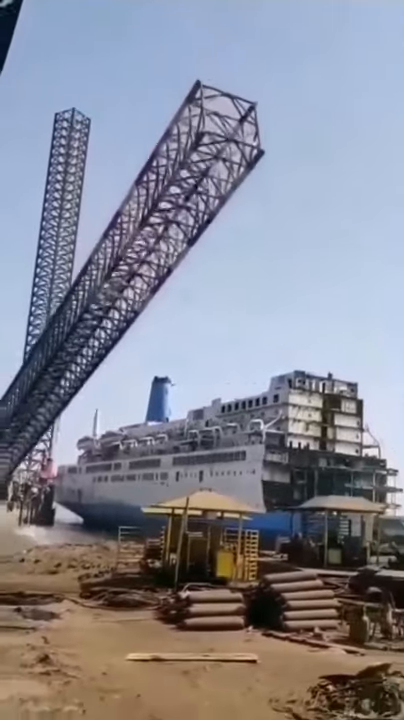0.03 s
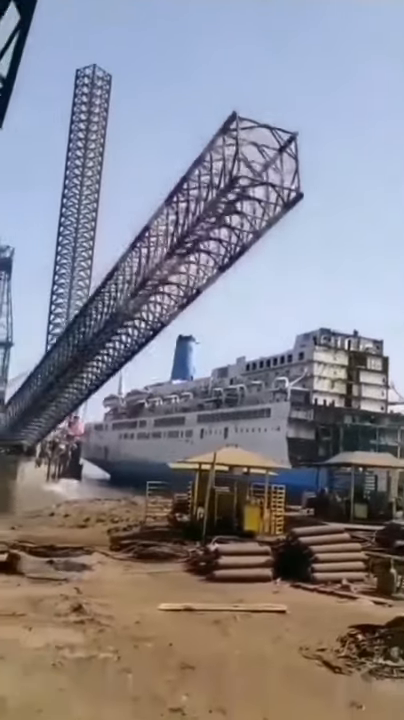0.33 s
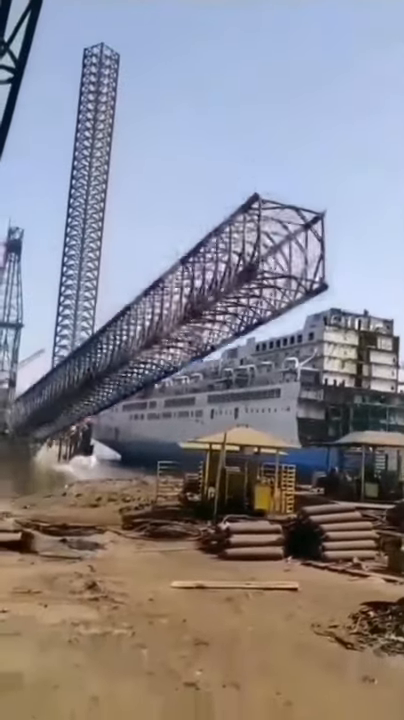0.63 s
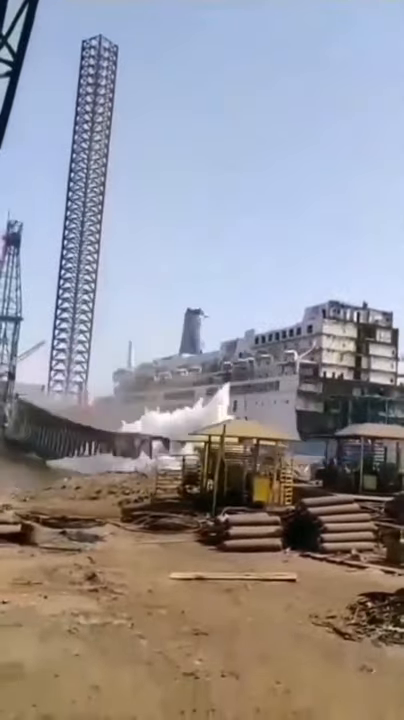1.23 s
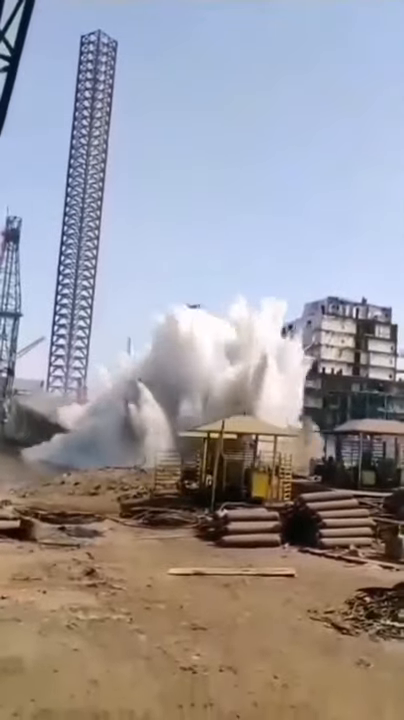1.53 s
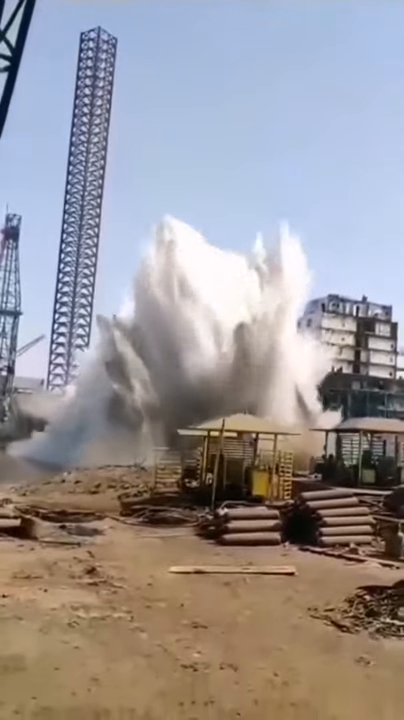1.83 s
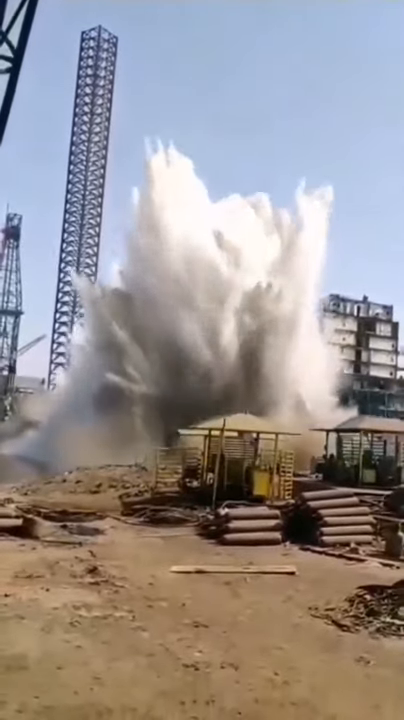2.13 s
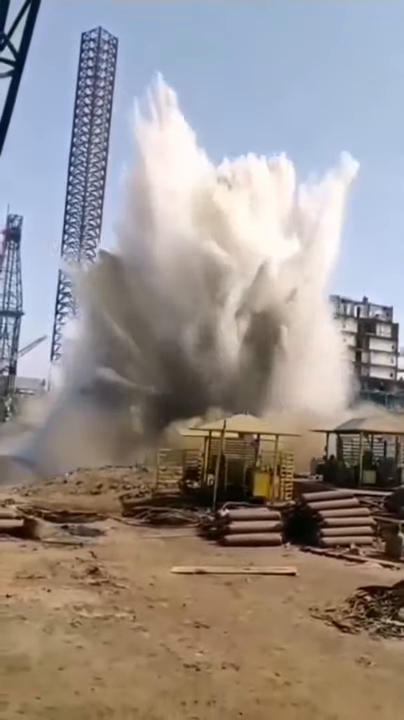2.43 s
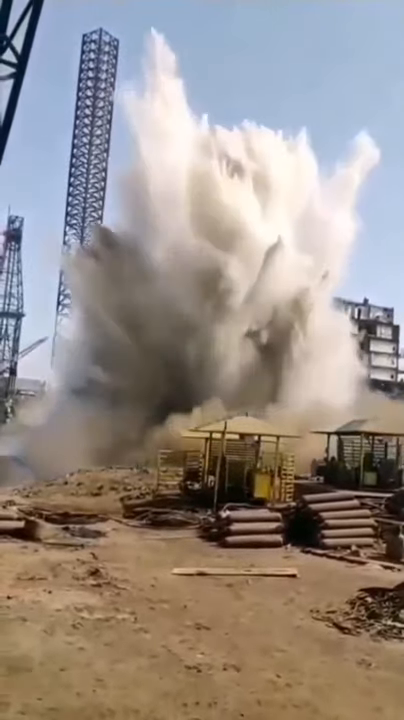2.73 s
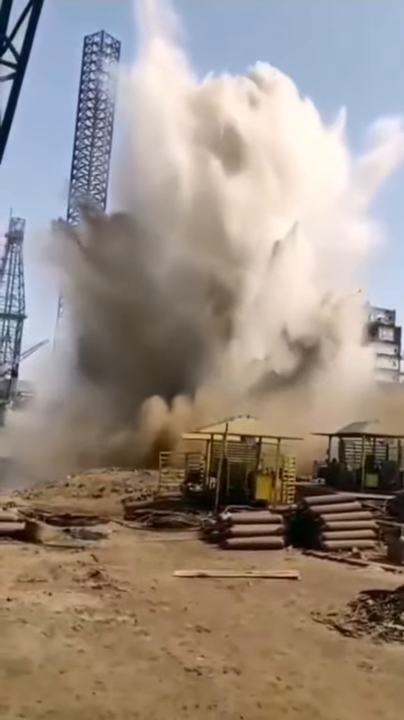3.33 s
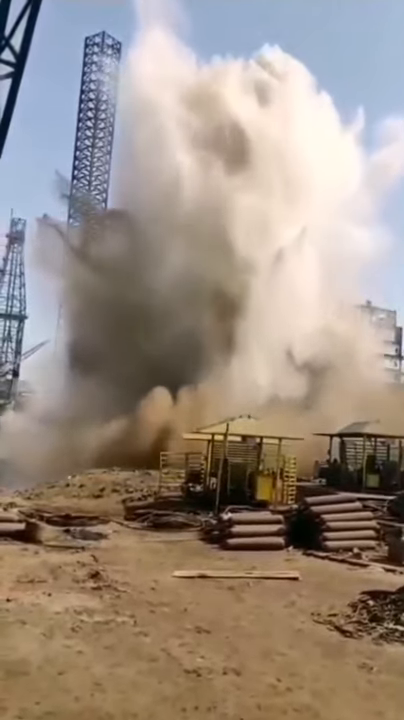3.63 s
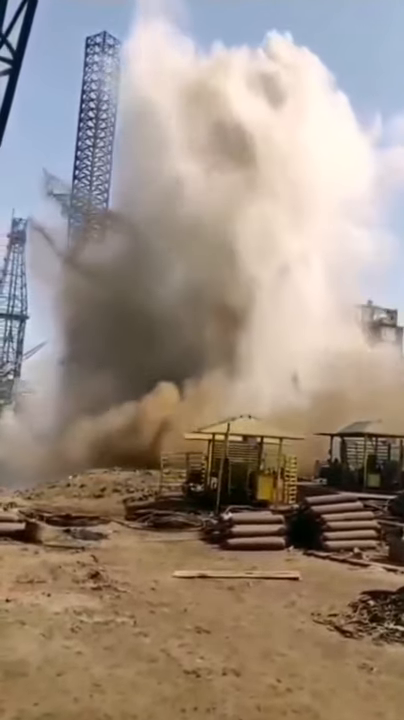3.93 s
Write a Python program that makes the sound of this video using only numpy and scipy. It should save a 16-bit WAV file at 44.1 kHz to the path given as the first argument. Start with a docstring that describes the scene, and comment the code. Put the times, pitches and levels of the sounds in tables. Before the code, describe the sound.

A huge steel tower topples into water, heard from far off. It groans low at first, then clatters, clangs and crunches from about 0.6 seconds. Heavy thuds and a deep boom of water hit from 1.4 seconds, loudest near 1.8 with a brief crackle of spray. The splash roars on, easing after 2.7 seconds, with two more thuds around 3.4. Wind rumbles on the microphone under a thin hiss.

```python
"""Harbour yard, from far off: a huge steel lattice tower topples into the water.
Its foot slips and groans; buckling members clatter, clang, crunch and scrape; loose pieces ring.
Sections slam down, the churn booms, and a plume roars up with a crackle of spray.
Wind rumbles on the microphone under a thin hiss; a limiter holds the loudest part down."""
import sys
import numpy as np
from scipy import signal
from scipy.fft import rfft, irfft, next_fast_len
from scipy.io import wavfile
from scipy.ndimage import uniform_filter1d, minimum_filter1d, map_coordinates

SR = 44100
rng = np.random.default_rng(int(sys.argv[2]) if len(sys.argv) > 2 else 0)


def transcribe(signal):
    """Save signal, clipped to [-1, 1], as a 16-bit WAV file at the path in sys.argv[1]."""
    frames = np.atleast_2d(signal).T
    limited = np.clip(frames, -1, 1)
    pcm = np.round(limited * 32767).astype(np.int16)
    wavfile.write(sys.argv[1], SR, pcm)


N = 176400
TIME_S = np.arange(N) / SR

# thuds of tower sections and falling water (time [s], level [dB], pitch [Hz])
SLAMS = [(1.222, -17, 151), (1.44, -10.5, 137.6), (1.515, -7, 128.8), (1.575, -6, 104.5), (1.635, -9, 79),
         (1.703, -2.5, 133.9), (1.775, -5.5, 206.6), (1.85, -7, 97), (1.935, -7.5, 77.6),
         (2.025, -5.5, 188.8), (3.36, -10.5, 110.4), (3.46, -9.5, 154.2), (3.69, -18, 95.9)]
# churning water (time [s], level [dB])
CHURN_LEVEL = [(0, -27.5), (1.1, -27), (1.42, -26), (1.53, -18), (1.68, -13), (1.78, -11.5), (1.95, -12.5),
               (2.15, -12.5), (2.3, -13), (2.7, -13.5), (3.05, -17), (3.3, -19.5), (3.4, -17),
               (3.52, -18.5), (3.7, -21.5), (3.8, -23.5), (4, -30)]
# its boom (frequency [Hz], density [dB])
CHURN_SPECTRUM = [(25, -28), (48, -26), (68, -3.5), (95, -3), (125, -2), (160, -1), (220, -4.5),
                  (300, -12.5), (450, -21.5), (900, -32), (3000, -99)]
# rising plume (time [s], level [dB])
PLUME_LEVEL = [(1.6, -50), (1.76, -21), (1.87, -12), (1.96, -17.5), (2.2, -17), (2.5, -16), (2.65, -18),
               (2.9, -18), (3.2, -20.5), (3.5, -22), (3.8, -23), (4, -26)]
# its roar, plus a faint separate fizz near 13-14 kHz (frequency [Hz], density [dB])
PLUME_SPECTRUM = [(80, -17), (150, -2.5), (230, -0.5), (320, -1), (480, -7.5), (800, -6.5), (1100, -11.5),
                  (1400, -15.5), (1850, -16), (2250, -27.5), (2500, -30), (2900, -39.5), (4000, -49),
                  (7000, -53), (10000, -74), (14000, -52)]
# buckling members (time [s], level [dB])
CLATTER_LEVEL = [(0, -31), (.45, -30.5), (.56, -26), (.66, -21.5), (.9, -17), (1.1, -18), (1.25, -21.5),
                 (1.36, -23), (1.55, -19), (1.7, -18), (2.1, -44), (2.6, -57)]
# their clatter, plus a faint separate fizz near 13-14 kHz (frequency [Hz], density [dB])
CLATTER_SPECTRUM = [(60, -40), (170, -1.5), (250, 7), (350, -1.5), (510, -6), (640, 1.5), (860, -2),
                    (1100, -7), (1400, -11.5), (1800, -9.5), (2300, -19), (2550, -23), (2900, -34),
                    (5000, -42), (7000, -47), (10000, -66), (14000, -42)]
# single steel clangs (time [s], level [dB], pitch [Hz])
CLANGS = [(.645, -6, 229.6), (.912, -10, 700), (1.215, -4.5, 281), (1.478, -5.5, 871), (2.37, -34, 3630)]
# straining foot (time [s], level [dB])
STRAIN_LEVEL = [(0, -22), (.2, -22), (.35, -25), (.5, -22), (.68, -22.5), (.95, -25), (1.25, -21.5),
                (1.36, -21), (1.65, -29.5), (2.2, -40)]
# low frame resonances (frequency [Hz], width [Hz], gain [dB])
FRAME_MODES = [(171, 75, -7.5), (206, 64, -10), (307, 78, -14), (350, 51, -21.5), (724, 380, -30)]
# lowest mode swelling under load (time [s], level [dB])
MOAN_LEVEL = [(0, -31), (.07, -22), (.12, -19.5), (.22, -21), (.3, -34), (.39, -18.5), (.47, -37),
              (.9, -26.5), (1.24, -21), (1.32, -49), (2, -81)]
# crunches of steel and water (time [s], level [dB])
CRUNCHES = [(.6, -27), (.66, -26.5), (.79, -21), (.86, -23.5), (.945, -34), (1.03, -19.5), (1.18, -26.5),
            (1.482, -27), (1.79, -24), (1.83, -20), (1.87, -19), (1.985, -18.5), (2.07, -18),
            (2.185, -18.5), (2.275, -29), (2.43, -22), (2.53, -21.5), (2.69, -31), (3.02, -35)]
# their colour (frequency [Hz], density [dB])
CRUNCH_SPECTRUM = [(200, -20), (450, -11), (700, -2), (1200, 12), (1900, 5.5), (2400, -8.5), (3000, -23),
                   (6000, -24), (13000, -53)]
# spray (time [s], level [dB])
SPRAY_LEVEL = [(1.715, -75), (1.727, -39.5), (1.775, -41), (1.805, -37.5), (1.875, -33.5), (1.915, -41.5),
               (2.0, -46), (2.04, -46), (2.09, -44), (2.2, -58), (2.4, -70)]
# its crackle, plus a separate fizz near 13-14 kHz (frequency [Hz], density [dB])
SPRAY_SPECTRUM = [(1500, -25), (3200, 6.5), (6000, 2.5), (8000, 1.5), (10500, -4), (13500, 1.5)]
# steel and debris scrapes (start [s], level [dB], length [s])
SCRAPES = [(0.593, -44, .08), (0.76, -42, 0.071), (1.023, -43, 0.15), (1.322, -44, 0.081),
           (1.543, -45, 0.082), (2.485, -42, .035), (2.864, -45, 0.053), (2.942, -47, 0.041),
           (3.16, -49.5, 0.11)]
# their grit, plus a faint separate fizz near 13-14 kHz (frequency [Hz], density [dB])
GRIT_SPECTRUM = [(1200, -20), (2600, 13), (3600, 2.5), (5500, 1), (8000, -4.5), (11000, -17), (13500, -6)]
# loose steel ringing (time [s], level [dB])
RATTLE_LEVEL = [(0, -53.5), (.5, -50), (.75, -45), (1.1, -44), (1.65, -49.5), (1.9, -40.5), (2.4, -51),
                (2.95, -50), (3.1, -55.5), (4, -59)]
# its colour (frequency [Hz], gain [dB])
RATTLE_SPECTRUM = [(1200, -32), (2200, 11), (3000, 8.5), (4800, 3), (6800, 1.5), (9000, -19)]
# wind on the microphone (time [s], level [dB])
WIND_LEVEL = [(0, -32.5), (.7, -30.5), (1.2, -27), (1.6, -20.5), (1.9, -31), (2.4, -27), (3.3, -24.5),
              (4, -26.5)]
# its rumble (frequency [Hz], density [dB])
WIND_SPECTRUM = [(8, -30), (20, -13), (38, -8.5), (70, -9), (120, -9), (300, -59), (1000, -65)]
# thin hiss (time [s], level [dB])
HISS_LEVEL = [(0, -48.5), (.3, -49.5), (.55, -46.5), (.75, -44), (1.25, -45.5), (1.58, -41.5), (1.69, -52),
              (2.4, -53), (2.92, -51), (3.08, -58), (3.25, -47), (3.6, -49.5), (3.8, -44.5), (4, -44)]
# its colour (frequency [Hz], density [dB])
HISS_SPECTRUM = [(800, -17), (2000, 13.5), (3200, 0.5), (5000, 0), (6800, -0.5), (8200, -1.5),
                 (11000, -13.5), (13500, -4.5)]


def impact(breakout_s=1.58, opening_s=0.15, cutoff_hz=210):
    """The tower hits the water section by section; the churn booms, dull until the plume breaks out."""
    boom = coloured(shower(per_s=700, wash=1.17), CHURN_SPECTRUM)
    deep = filtered(boom, lambda f: 1 / (1 + (f / cutoff_hz) ** 6))
    opened = np.clip((TIME_S - breakout_s) / opening_s, 0, 1)
    churn = level(CHURN_LEVEL) * (deep + opened * (boom - deep))
    return churn + blows(SLAMS, wander=0.06, t60_s=0.39, attack_s=0.0066)


def plume(cutoff_hz=800, dull_from_s=1.67, dull_db_per_s=1.5):
    """Thrown water roars, growing duller as it slows."""
    roar = patchy(coloured(shower(per_s=2500, wash=1.28), PLUME_SPECTRUM), depth_db=1.5)
    low = filtered(roar, lambda f: 1 / (1 + (f / cutoff_hz) ** 4))
    age_s = np.maximum(TIME_S - dull_from_s, 0)
    treble_gain = amp(-dull_db_per_s * age_s) * flicker(depth_db=1.45, per_s=24.87)
    return level(PLUME_LEVEL) * (low + treble_gain * (roar - low))


def buckling():
    """Members clash as the lattice folds, pitch drifting with their size; a few clang out."""
    clatter = patchy(coloured(shower(per_s=1400, wash=1.35), CLATTER_SPECTRUM), depth_db=1.93)
    pitch_ratio = 1 + 0.09 * wobble(per_s=9)
    clatter = map_coordinates(clatter, [np.cumsum(pitch_ratio)])
    clatter *= level(CLATTER_LEVEL) * flicker(depth_db=0.36, per_s=21.4)
    return clatter + blows(CLANGS, wander=0.065, t60_s=0.085, attack_s=0.0068)


def groan(moan_hz=151, cutoff_hz=1200):
    """Irregular slips at the foot shake the frame's low resonances; its lowest mode moans."""
    def frame_response(f):
        modes = sum(amp(db) * resonance(f, hz, width_hz) for hz, width_hz, db in FRAME_MODES)
        return modes / (1 + (f / cutoff_hz) ** 4)

    frame = filtered(shower(per_s=260, wash=1.44), frame_response)
    pitch_hz = moan_hz * (1 + 0.0675 * wobble(per_s=50))
    moan = np.sin(2 * np.pi * np.cumsum(pitch_hz) / SR) * flicker(depth_db=1, per_s=35.4)
    return level(STRAIN_LEVEL) * unit(frame) + level(MOAN_LEVEL) * unit(moan)


def crunches():
    """Whole lattice bays give way, each a short dense burst."""
    power = np.zeros(N)
    for start_s, db in CRUNCHES:
        age_s = np.maximum(TIME_S - start_s, 0)
        power += (amp(db) * strike_envelope(age_s, attack_s=0.0096, t60_s=0.28)) ** 2
    return np.sqrt(power) * coloured(shower(per_s=2000, wash=1.0), CRUNCH_SPECTRUM)


def spray():
    """Water tears apart: a short crackling hiss."""
    drops = coloured(shower(per_s=3100, wash=0.84), SPRAY_SPECTRUM)
    return level(SPRAY_LEVEL) * flicker(depth_db=0.97, per_s=16) * drops


def scrapes():
    """Steel drags on steel and debris slides: short swells of grit."""
    swell = np.zeros(N)
    for start_s, db, length_s in SCRAPES:
        progress = np.clip((TIME_S - start_s) / length_s, 0, 1)
        swell += amp(db) * np.sin(np.pi * progress)
    return swell * coloured(shower(per_s=1100, wash=0.83), GRIT_SPECTRUM)


def rattle(rings_per_s=700, low_hz=1477, high_hz=6980, range_db=16):
    """Loose bars and plates ring briefly, each at its own pitch."""
    rings = np.zeros(N + SR)
    age_s = np.arange(SR // 8) / SR
    envelope = strike_envelope(age_s, attack_s=0.0086, t60_s=0.11)
    for when, pitch, softness in rng.random((int(rings_per_s * N / SR), 3)):
        hz = low_hz + (high_hz - low_hz) * pitch
        ring = amp(-range_db * softness) * envelope * np.sin(2 * np.pi * hz * age_s)
        rings[int(when * N):][:len(ring)] += ring
    return level(RATTLE_LEVEL) * coloured(rings[:N], RATTLE_SPECTRUM)


def wind():
    """Gusts buffet the microphone."""
    gusts = level(WIND_LEVEL) * flicker(depth_db=0.69, per_s=3.7)
    return gusts * coloured(rng.standard_normal(N), WIND_SPECTRUM)


def hiss():
    """Thin, grainy background hiss."""
    grains = patchy(coloured(shower(per_s=1500, wash=0.96), HISS_SPECTRUM), depth_db=4.5)
    return level(HISS_LEVEL) * flicker(depth_db=1.2, per_s=22.7) * grains


def blows(rows, wander, t60_s, attack_s):
    """Each blow rings a cluster of close modes: a dying tone with wandering phase."""
    tones = np.zeros(N)
    for start_s, db, hz in rows:
        age_s = np.maximum(TIME_S - start_s, 0)
        pitch_hz = hz * (1 + wander * wobble(per_s=hz / 2))
        phase = 2 * np.pi * np.cumsum(pitch_hz * (age_s > 0)) / SR
        tones += amp(db) * np.sin(phase) * strike_envelope(age_s, attack_s, t60_s)
    return tones


def shower(per_s, wash, spread_db=2.5):
    """Tiny random impacts of uneven size; a noise wash stands for their blurred echoes."""
    hits = (rng.random(N) < per_s / SR) * np.sign(rng.standard_normal(N))
    hits *= amp(spread_db * rng.standard_normal(N))
    return unit(unit(hits) + wash * rng.standard_normal(N))


def patchy(x, depth_db):
    """Scattering on the way: random patches of gain in frequency and time."""
    spectra = signal.stft(x, nperseg=1024)[2]
    patches = uniform_filter1d(rng.standard_normal(spectra.shape), size=4, axis=0)
    patches = uniform_filter1d(patches, size=8, axis=1)
    spectra *= amp(depth_db * unit(patches))
    return unit(signal.istft(spectra, nperseg=1024)[1][:N])


def strike_envelope(age_s, attack_s, t60_s):
    """Fast rise, exponential decay."""
    return (1 - np.exp(-age_s / attack_s)) * amp(-60 * age_s / t60_s)


def resonance(f, hz, width_hz):
    """Response of one damped mode."""
    return 1j * f * width_hz / (hz * hz - f * f + 1j * f * width_hz)


def coloured(x, spectrum):
    """x shaped by (frequency [Hz], gain [dB]) points, at rms 1."""
    hz, db = np.transpose(spectrum)
    return unit(filtered(x, lambda f: amp(np.interp(np.log(f + 1), np.log(hz + 1), db))))


def filtered(x, response):
    """x through a frequency response."""
    size = next_fast_len(N + SR // 2)
    return irfft(rfft(x, size) * response(np.fft.rfftfreq(size, 1 / SR)), size)[:N]


def flicker(depth_db, per_s):
    """Smooth random gain."""
    return amp(depth_db * wobble(per_s))


def wobble(per_s):
    """Smooth curve through Gaussian knots."""
    knots = rng.standard_normal(int(N * per_s / SR) + 4)
    return map_coordinates(knots, [TIME_S * per_s])


def level(rows):
    """Gain per sample from (time [s], level [dB]) points."""
    return amp(np.interp(TIME_S, *np.transpose(rows)))


def amp(db):
    """Decibels to gain."""
    return 10 ** (np.asarray(db) / 20)


def unit(x):
    """Scale to rms 1."""
    return x / np.sqrt(np.mean(x ** 2) + 1e-20)


def scene():
    """Steel, water and air at one microphone."""
    steel = groan() + buckling() + rattle() + crunches()
    water = impact() + plume() + spray()
    return (steel + water + wind() + hiss() + scrapes())[None]


def record(dry, threshold_db=-5, slope=0.76, lookahead_s=0.0081, top_hz=14050):
    """Fast limiter, then band limit."""
    x = dry[0]
    span = int(lookahead_s * SR)
    needed_gain = np.minimum(1, amp(threshold_db) / (np.abs(x) + 1e-9)) ** slope
    gain = uniform_filter1d(minimum_filter1d(needed_gain, span), span)
    return filtered(x * gain, lambda f: f < top_hz)[None]


dry = scene()
out = record(dry)
transcribe(out)
```